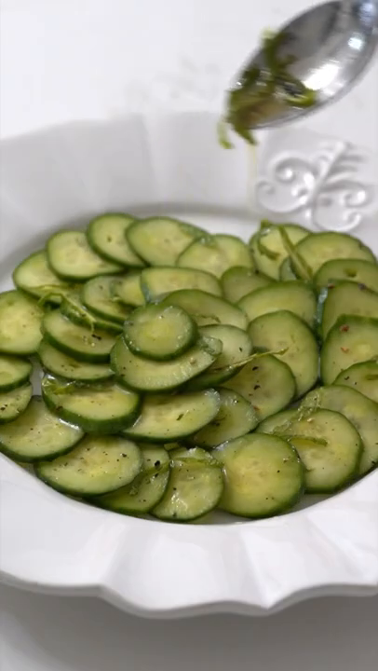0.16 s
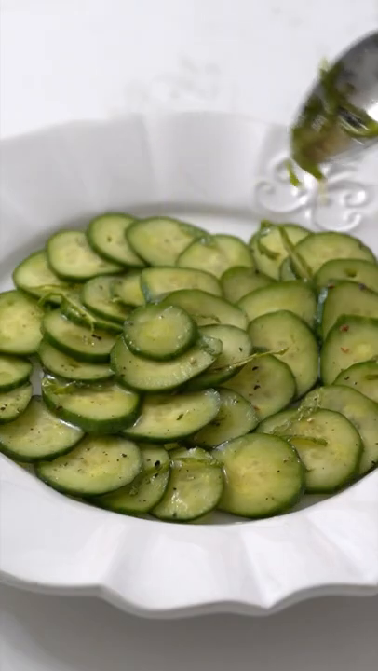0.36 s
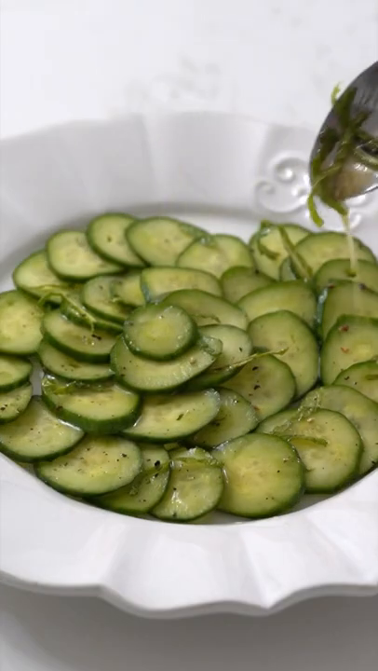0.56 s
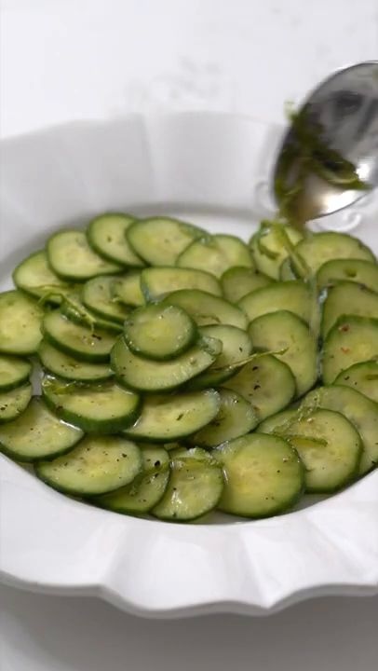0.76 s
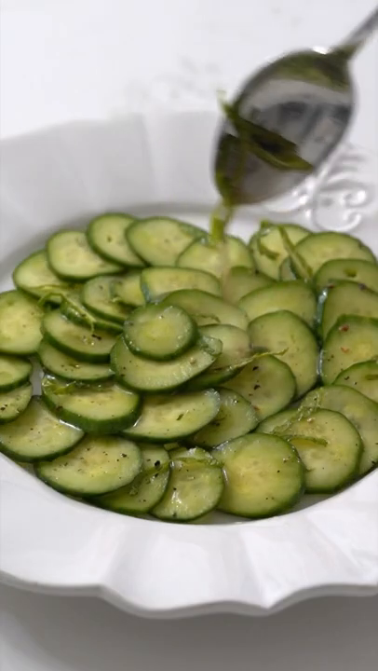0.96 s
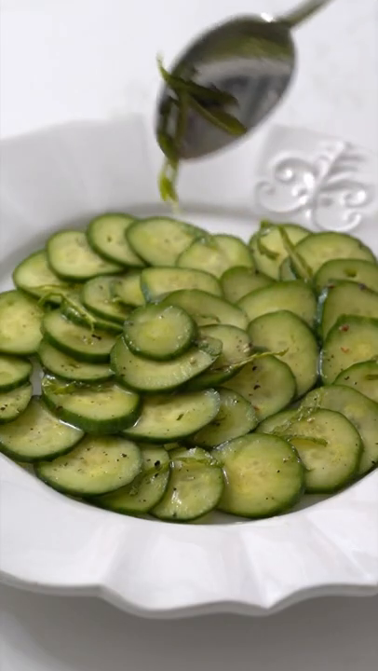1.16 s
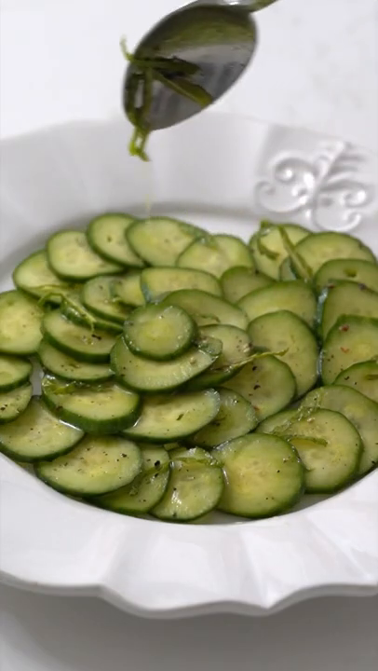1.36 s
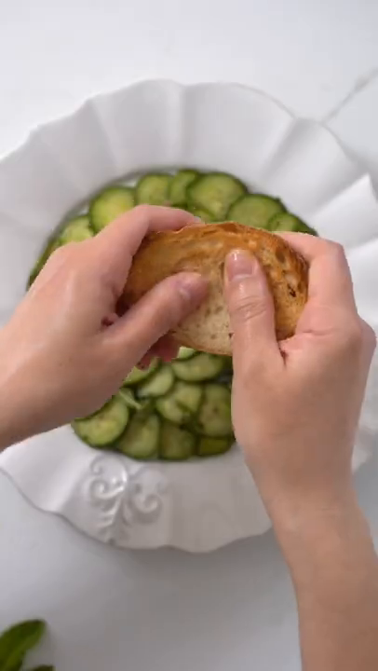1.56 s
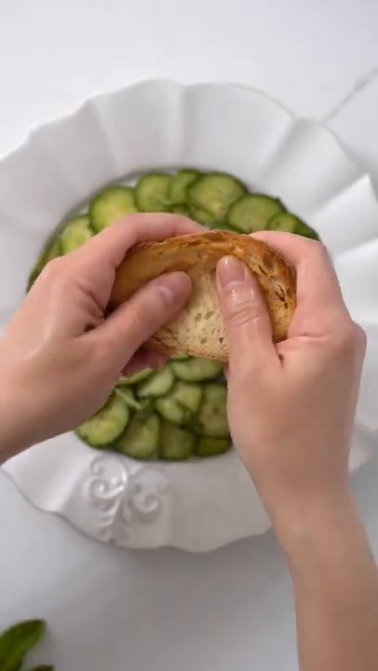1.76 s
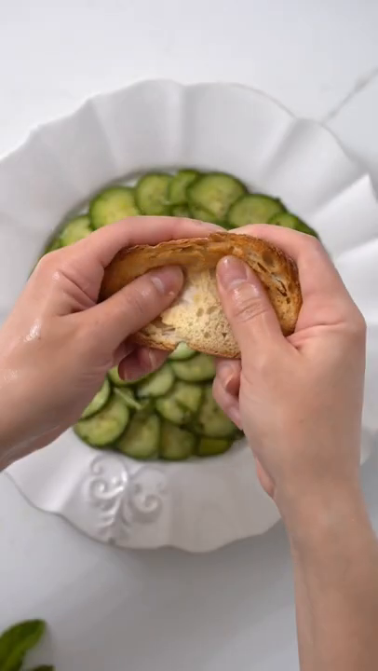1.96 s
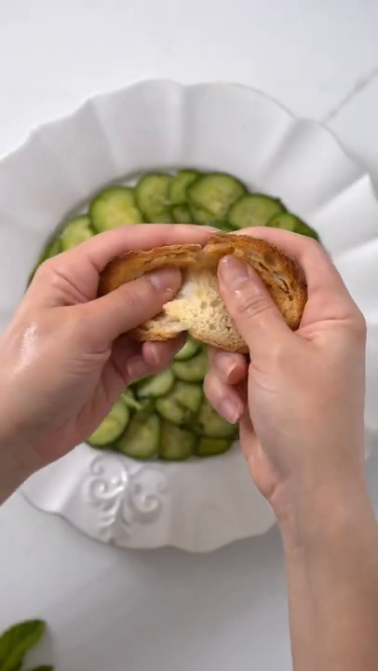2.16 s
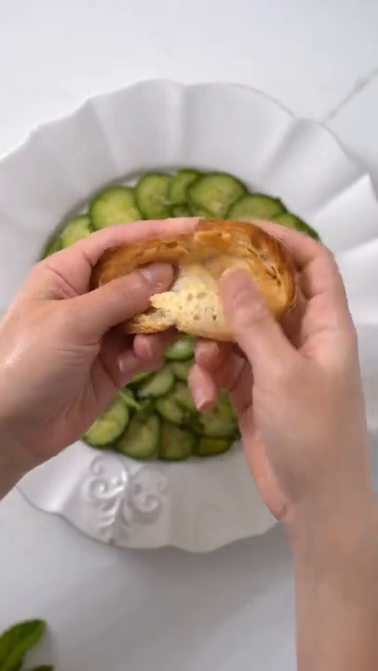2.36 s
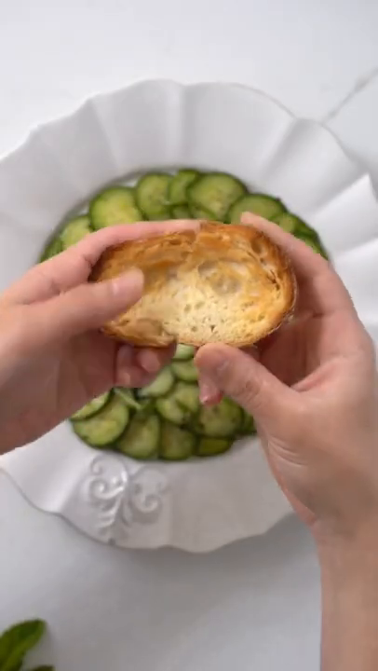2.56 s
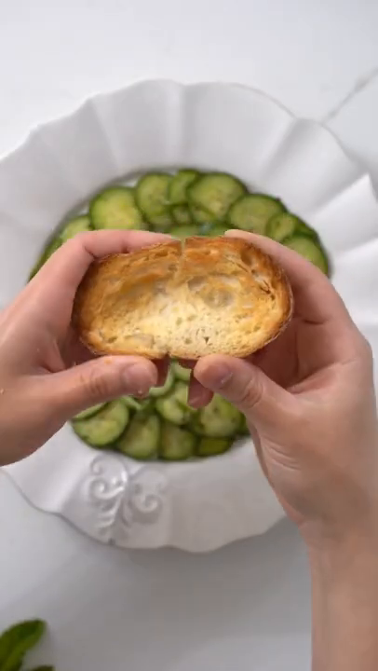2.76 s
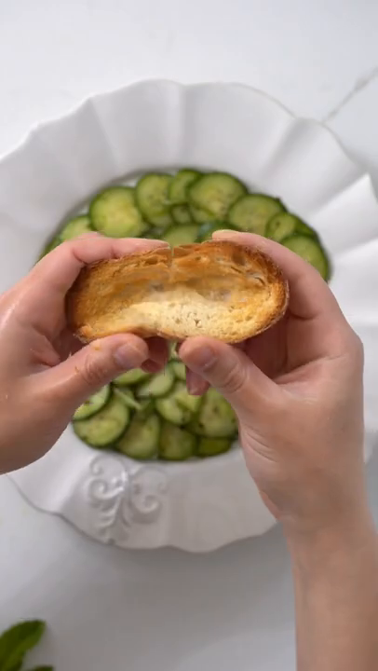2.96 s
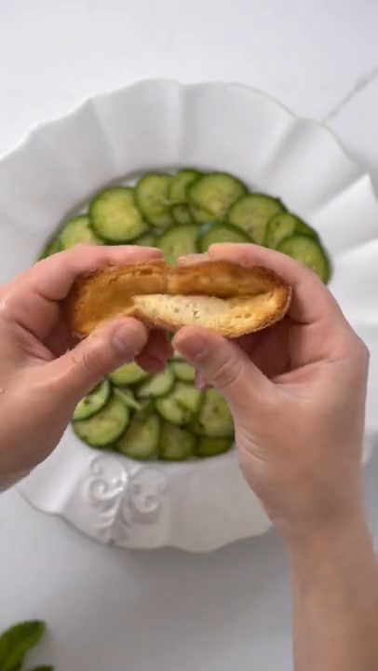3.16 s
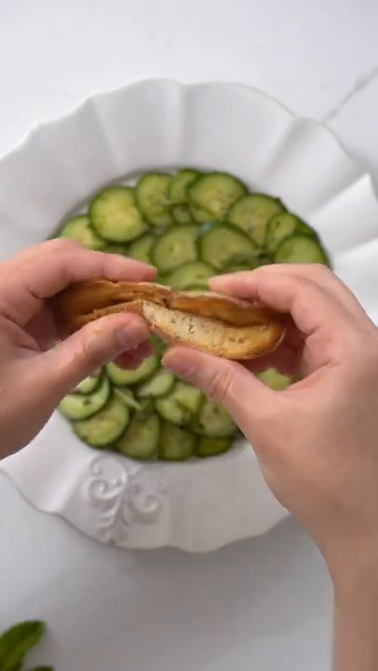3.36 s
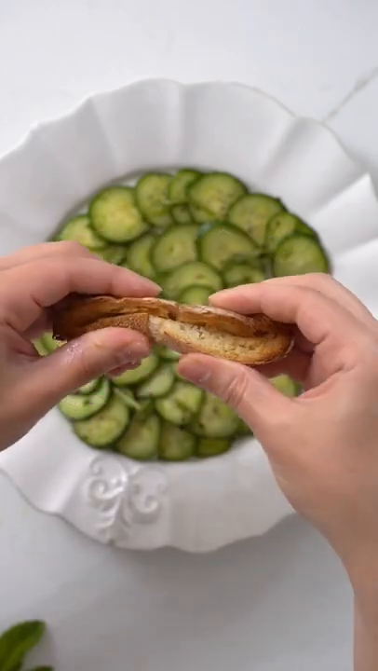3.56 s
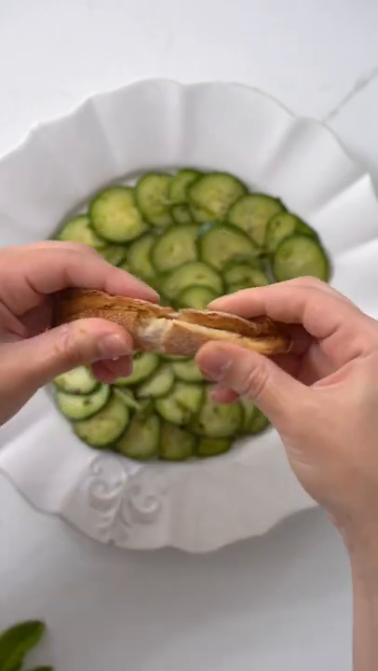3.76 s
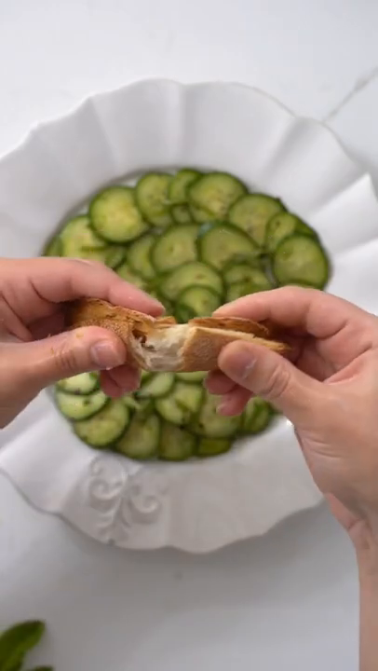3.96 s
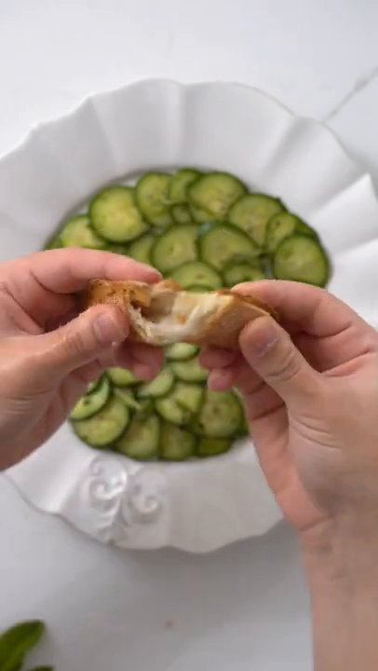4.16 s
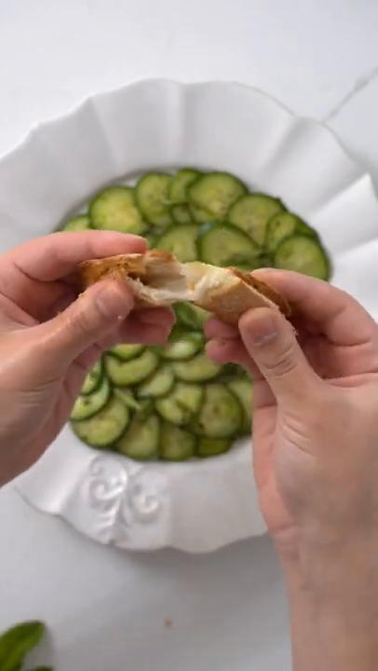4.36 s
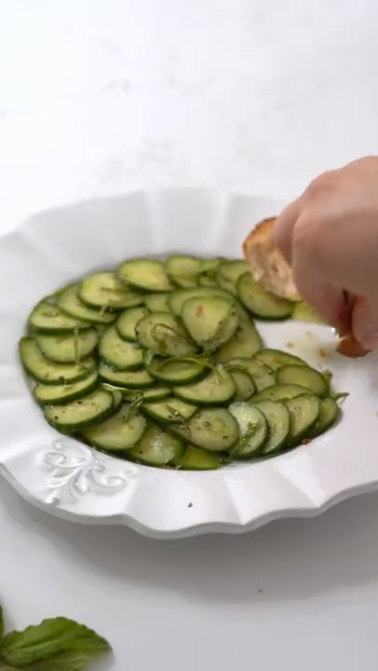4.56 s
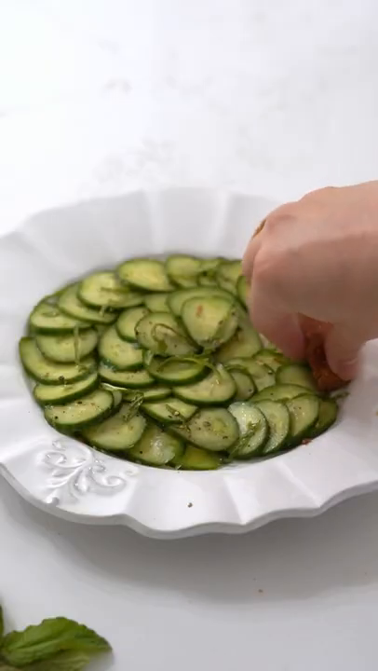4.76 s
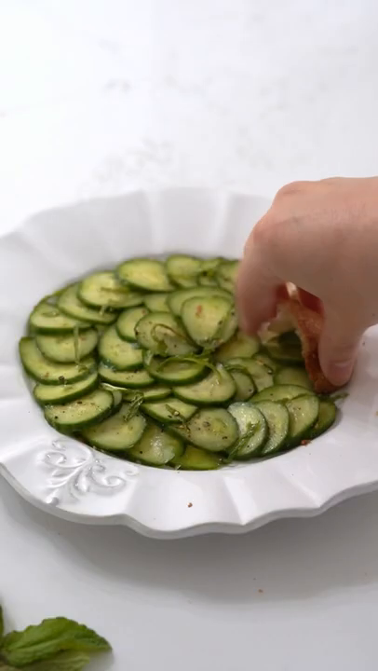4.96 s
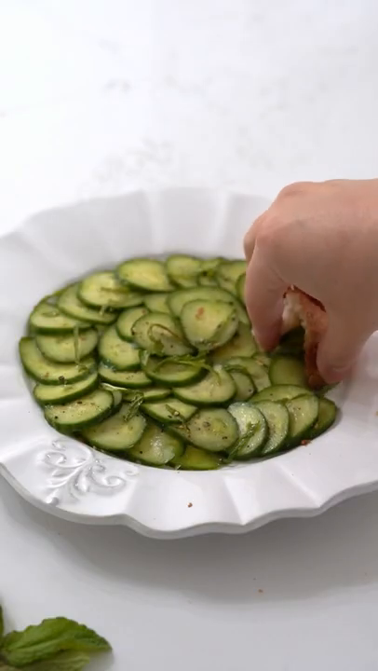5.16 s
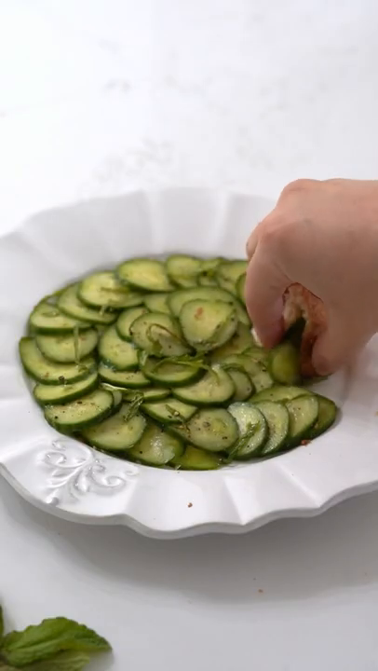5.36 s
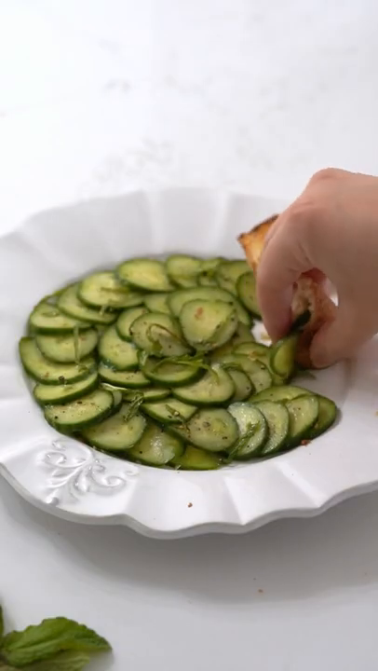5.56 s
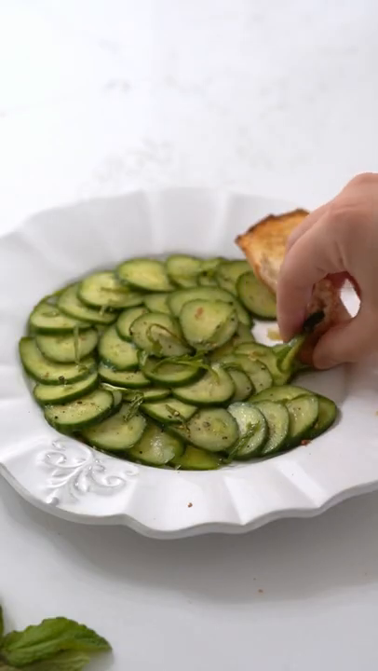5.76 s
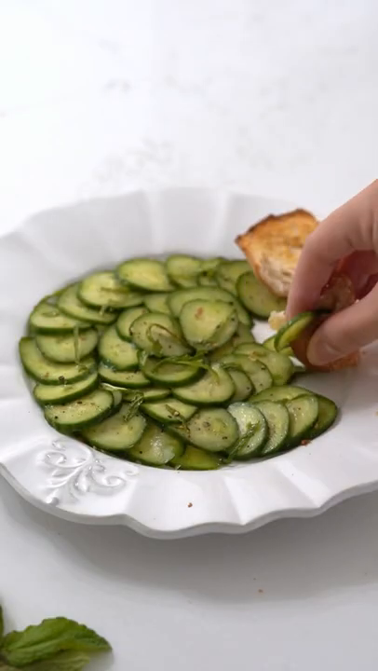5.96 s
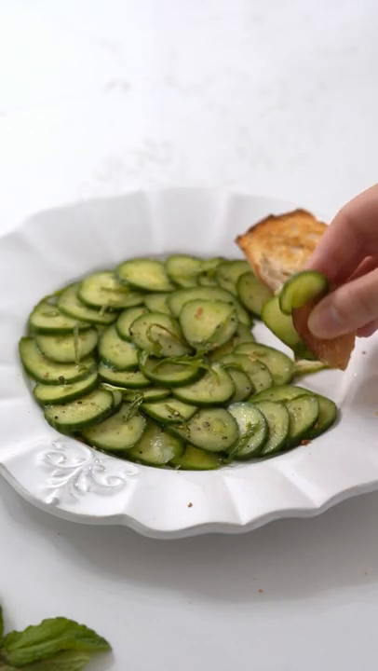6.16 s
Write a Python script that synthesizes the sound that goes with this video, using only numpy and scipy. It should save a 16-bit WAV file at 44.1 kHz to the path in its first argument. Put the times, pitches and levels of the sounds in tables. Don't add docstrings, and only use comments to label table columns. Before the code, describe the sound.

An appliance motor hums briefly, then crisp toast crunches and snaps loudly between hands, followed by light scraping and two knocks on a ceramic plate.

```python
import sys
import numpy as np
from scipy import signal
from scipy.io import wavfile
from scipy.ndimage import uniform_filter1d

SR = 44100
rng = np.random.default_rng(int(sys.argv[2]) if len(sys.argv) > 2 else 0)


def waveform_to_disk(signal):
    frames = np.transpose(np.atleast_2d(signal))
    scaled = np.clip(frames, -1, 1) * 32767
    samples = np.round(scaled).astype(np.int16)
    wavfile.write(sys.argv[1], SR, samples)


def boost_factor(decibels):
    exponent = np.asarray(decibels, float) / 20
    return 10 ** exponent


N = 277389
T = np.arange(N) / SR

JOINS = (1.468, 4.556)
# frequency in Hz, density in dB per Hz.
CRUST = [(150, -33), (300, -28.5), (500, -19.5), (850, -14.5), (1250, -10), (1700, -3), (2200, -1.5),
         (3200, -1.5), (6500, -4.5), (9000, -6), (16000, -7)]
# time in seconds, peak in dB, ring in dB, weight of the upper modes in dB.
KNOCKS = [
    (4.6838, -27, -17.5, -2),
    (5.0095, -32.5, -20.5, 7),
]


def evened(x):
    return x / np.sqrt(np.mean(x ** 2) + 1e-20)


def read(points, hz):
    f, value = np.transpose(points)
    return np.interp(np.log(hz + 1), np.log(f + 1), value)


def add(mix, s, sound):
    part = mix[..., round(s * SR):][..., :sound.shape[-1]]
    part += sound[..., :part.shape[-1]]


def coloured(x, gain_db):
    log = np.log(boost_factor(np.maximum(gain_db(abs(np.fft.fftfreq(1024, 1 / SR))), -90)))
    taps = np.fft.ifft(np.exp(log - 1j * signal.hilbert(log).imag)).real[:512]
    return signal.oaconvolve(x, taps)[:len(x)]


def wander(hz):
    return evened(sum(np.sin(2 * np.pi * (f * T + rng.random())) for f in hz * np.geomspace(.1, 1, num=8)))


def take(k):
    fades = (.03, .009)
    after = [1, *(np.clip((T - s) / fade + .5, 0, 1) for s, fade in zip(JOINS, fades)), 0]
    return after[k] - after[k + 1]


def air():
    # frequency in Hz, density in dB per Hz.
    colours = [
        [(12, -35), (20, -18), (80, -9.5), (154, -6.5), (241, -9), (386, -17), (516, -20), (588, -21),
         (894, -21.5), (1050, -26), (1430, -22), (2070, -27), (3310, -26.5), (6380, -33.5), (10500, -36),
         (13600, -88), (22000, -120)],
        [(12, -30), (30, -6), (55, 1), (100, 9.5), (160, 5), (330, 5.5), (900, 0), (1500, -2), (3300, -6),
         (8000, -8.5), (16500, -12)],
        [(12, -28), (25, -14), (45, -3), (75, -7), (146, -11), (204, -7.5), (367, -11), (642, -12),
         (1000, -16.5), (1960, -18), (2670, -20), (3250, -20.5), (11400, -25.5), (14500, -27), (16500, -31)],
    ]
    levels = [-53.5, -55.5, -58.5]
    # frequency in Hz, likeness from -1 to 1.
    likeness = [(20, 0.9), (60, 0.98), (180, 0.83), (550, 0.01), (1650, -.1), (5000, 0.02), (15000, 0.1)]
    first_edge_hz = 10620
    frames, hz = N // 512 + 5, np.fft.rfftfreq(2048, 1 / SR)
    a, b, c, d, patches = rng.standard_normal((frames, 1025, 5)).T
    patches = evened(uniform_filter1d(uniform_filter1d(patches, 12, 0), 6, 1))
    same = np.clip(read(likeness, hz), -1, 1)[:, None]
    left = a + 1j * b
    right = same * left + np.sqrt(1 - same ** 2) * (c + 1j * d)
    z = np.array([left, right]) * boost_factor(1.63 * patches)
    out = np.zeros((2, N))
    for k, (colour, db) in enumerate(zip(colours, levels)):
        gain = boost_factor(read(colour, hz)) * (k > 0 or hz < first_edge_hz)
        noise = signal.istft(z * gain[..., None], nperseg=2048, noverlap=1536)[1][:, :N]
        out += take(k) * boost_factor(db) * evened(noise)
    return out


def machines():
    # multiple of the shaft rate, level in dB.
    motor = [(1, -64), (2, -66), (24, -81), (26, -79), (27, -80), (30, -73.5), (31, -69), (41, -80),
             (44, -83), (47, -83), (51, -79), (57, -81)]
    # frequency in Hz, level in dB.
    booms = [(110, -64.5), (148.5, -58.5), (171, -66), (236, -65), (255, -66), (510, -75.5), (3287, -80),
             (3405, -83), (10816, -84)]
    # start in seconds, end in seconds, multiple of its rate, level in dB.
    swells = [
        (2.2, 3.0, 1, -87),
        (4.446, 5.366, 1, -68.5),
        (4.505, 4.7, 2, -64),
        (5.49, 6.4, 2, -63),
    ]
    faint = (-72.5, -79)
    shaft_hz, drone_hz, swell_s = 29.61, 97.4, 0.046
    out = np.zeros((2, N))
    tones = [(round(k) * shaft_hz, db, .8, 0) for k, db in motor] + [(hz, db, 3., .6) for hz, db in booms]
    for hz, db, waver_db, drift in tones:
        step = rng.random() + rng.uniform(-.12, .12, (2, 1)) * min(hz / 900, 1)
        step = step + drift * wander(5.2) / (2 * np.pi)
        out += np.sqrt(2) * boost_factor(db + waver_db * wander(14.)) * np.sin(2 * np.pi * (hz * T + step))
    drone = sum(boost_factor(db) * np.sin(2 * np.pi * (k + 1) * drone_hz * T) for k, db in enumerate(faint))
    for start, end, k, db in swells:
        swell = np.clip(np.minimum(T - start, end - T) / swell_s, 0, 1)
        drone += boost_factor(db - 3.5) * swell * np.sin(2 * np.pi * round(k) * drone_hz * T)
    drone += boost_factor(-73.5 + 1.5 * wander(4.7)) * np.sin(2 * np.pi * 59.2 * T)
    return take(0) * out * boost_factor([[.6], [-.6]]) + np.sqrt(2) * (1 - take(0)) * drone


def patter():
    # peak in seconds, strength in dB, swell in dB/s, release in dB/s.
    presses = [(1.57, -32, 152, 60), (1.81, -38.5, 60, 91), (1.91, -43, 1203, 194), (2.049, -40, 500, 54),
               (2.28, -33, 600, 500), (2.3, -55, 498, 100), (2.97, -36, 105, 204), (3.218, -29.5, 137, 199),
               (3.4, -32, 210, 502), (3.441, -32, 2502, 800), (3.46, -42.5, 600, 36),
               (3.62, -30.5, 258, 160), (3.772, -24.5, 259, 203), (3.87, -44.5, 300, 46),
               (4.21, -45, 30, 128), (5.41, -55, 400, 200), (5.516, -50, 290, 87), (5.785, -56, 400, 151),
               (6.132, -57, 697, 117)]
    # time in seconds, crisp part above slab ring in dB.
    brittle = [(1.5, 8), (3.25, 7), (3.4, -10), (3.55, 6.5), (3.8, -5.5), (4.2, 2), (5.41, 11.5),
               (5.7, 4.5), (6.2, 5)]
    rate = 1300 * boost_factor(6.5 * evened(uniform_filter1d(rng.standard_normal(N), 250)))
    sizes = boost_factor(3.3 * np.minimum(rng.exponential(1, N), 4.2))
    clicks = (rng.random(N) < rate / SR) * sizes * rng.choice([-1, 1], N)
    slab = coloured(clicks, lambda hz: read(CRUST, hz) + read([(3000, 0), (4200, -21.5)], hz))
    crisp = coloured(clicks, lambda hz: read(CRUST, hz) + read([(2800, -13.5), (3800, 1.0)], hz))
    curves = []
    for s, db, swell, release in presses:
        cut_off = 99 * (s < JOINS[1]) * (T > JOINS[1])
        curves.append(db - np.maximum(swell * (s - T), release * (T - s)) - cut_off)
    press_db = np.max(curves, axis=0)
    brittle_db = np.interp(T, *np.transpose(brittle))
    fractures = evened(slab) * boost_factor(-8.0) + evened(crisp) * boost_factor(brittle_db - 9.5)
    return boost_factor(press_db) * fractures * (1 - take(0)) * boost_factor(0.26)


def snap(s, peak_db, crisp_db, shard_hz, ms, uneven_db, chance):
    lead_s = .004
    brief = ms < 7.4
    ahead = np.arange(2000) / SR - lead_s
    t = np.maximum(ahead, 0) / (ms / 1000)
    envelope = (t + 0.091) ** (.5 if brief else 1.3) * (np.exp(-3 * t ** 2) + 0.11 * np.exp(-t / 1.53))
    burst = chance[:2000] * boost_factor(uneven_db * chance[2000:]) * envelope
    burst *= np.where(ahead < 0, 0.58 * np.exp(ahead / 0.0013), 1)
    tilt = [(400, -3), (900, -6), (1500, -5.5 - crisp_db), (2500, -.6 - crisp_db), (3800, -0.44),
            (5500, 0.024), (8000, crisp_db + 0.1), (15000, crisp_db - 4.5)]

    def colour(hz):
        shard = 4.7 * np.exp(-(np.log2((hz + 1) / shard_hz) / 0.17) ** 2)
        return read(CRUST, hz) + read(tilt, hz) + shard

    click = np.linalg.norm(burst) * (np.arange(2000) == abs(burst).argmax())
    near = coloured(burst, colour)
    far = coloured(click if brief else burst, colour)
    return s - lead_s, boost_factor(peak_db) * np.array([near, far]) / abs(near).max()


def breaks():
    # time in seconds, peak in dB, crispness in dB, loudest shard in Hz.
    clear_snaps = [(1.493, -26.5, -6, 2110), (1.4999, -23.5, 15, 2090), (1.5266, -15, 6, 2110),
                   (1.5855, -13, -5.5, 2170), (1.6508, -13.5, 4, 5710), (1.6793, -17, 1, 2280),
                   (1.7145, -17, -4.5, 2300), (1.7597, -14, -0.5, 2230), (1.7208, -18.5, -10, 2240),
                   (1.8162, -6, 4, 6600), (1.8664, -23, -5, 6960), (1.9087, -7, -2, 4100),
                   (1.9205, -6, 0.5, 4300), (1.9728, -16, 3, 7500), (1.9959, -17.5, 4, 4560),
                   (2.0474, -8.5, 0.5, 2950), (2.1423, -17.5, -0.5, 2950), (2.1615, -17.5, 0, 4050),
                   (2.1945, -20, 1, 4200), (2.27, -15, -1.5, 3360), (2.2746, -11, -2.5, 4730),
                   (2.345, -18, 4, 9350), (2.383, -19, -3, 3270), (2.4817, -25.5, -1, 2660),
                   (2.5259, -24.5, -3.5, 2580), (2.558, -28.5, -1, 2450), (2.5852, -32, -8, 2050),
                   (2.617, -36.5, 14, 2470),
                   (2.674, -52, 3, 11000), (2.7377, -52, -4, 8000), (2.75, -32, -2, 2780),
                  (2.7653, -29.5, -2, 5700), (2.7697, -25, -2.5, 3630), (2.818, -29, -0.5, 4020),
                  (2.8468, -24, 0.5, 5330), (2.912, -20, -0.5, 2680), (2.9244, -11, -1, 4360),
                  (2.9778, -8, -1, 6400), (3.119, -20, -2.5, 2960), (3.137, -10, 0, 5200),
                  (3.1902, -14, 0.5, 2160), (3.2255, -18, -6, 2620), (3.2292, -14.5, 9, 11100),
                  (3.254, -19.5, -8.5, 3540), (3.362, -15, -0.5, 3220), (3.4413, -8, -1.5, 4330),
                  (3.4988, -25, -9, 1800), (3.5242, -20.5, -5, 2660), (3.544, -22.5, 3, 6500),
                  (3.5876, -26, 1, 5300), (3.5965, -20.5, -6, 2160), (3.6211, -20, -2, 2270),
                  (3.654, -17, -1, 2880), (3.7325, -17, 3, 3220), (3.7736, -11, -0.5, 2830),
                   (3.897, -21, -0.5, 2600), (3.9666, -20, -2.5, 6500), (4.0275, -21.5, 1, 2460),
                  (4.0783, -28, 11, 6100), (4.134, -24, 3, 5830), (4.153, -30.5, 7, 11100),
                  (4.1736, -35, 4, 11300), (4.1901, -21, 1.5, 4460), (4.2259, -30, 1, 5000),
                  (4.2826, -38, -5, 4000), (4.4304, -35, 1.5, 3800), (4.5451, -37.5, 3, 3660)]
    late_snaps = [(5.2126, -43, 14, 11500), (5.386, -55, 6, 7000), (5.535, -39, -8, 2000),
                  (5.4026, -30, 2, 3800), (5.408, -29, -0.5, 4100), (5.4172, -33, 3, 3510),
                  (5.4358, -37, 3, 2500), (5.491, -36, -2.5, 1940), (5.5045, -32.5, 0, 1940),
                  (5.5208, -22.5, -2, 1860), (5.7768, -27.5, 3, 3480)]
    crushes = [(1.5215, -14.5, 0.5, 2140), (1.553, -9.5, 4, 2350), (1.5683, -21.5, -6.5, 8100),
               (1.5994, -22, 16, 2460), (1.7569, -18, 2.5, 2210), (1.87, -19.5, -3, 6210),
               (2.878, -21, 1, 4400), (2.9852, -18, 11, 5740), (3.1444, -12, 7, 2700),
               (3.1945, -17.5, -4.5, 2100), (3.2146, -25, -1.5, 2460), (3.3873, -26, 0, 2960),
               (3.6072, -24, -1, 2290), (3.6307, -24, 0, 2900), (3.719, -19, 1.5, 2150),
               (3.7563, -18.5, 1, 1800), (3.7659, -16, 3.5, 2730), (3.7848, -29, 2, 2620),
               (4.195, -35, 8, 5500), (5.527, -37, 2, 2000), (5.67, -54, -12, 1950), (5.69, -49, -13, 2050),
               (5.712, -47, -6, 2000), (6.1345, -47, -7, 2090)]
    # time in seconds, peak in dB,
    # loudest shard in Hz.
    small_cracks = [(1.5147, -27, 5500), (1.532, -29, 2900), (1.5524, -17, 2000), (1.5579, -18, 2500),
                    (1.5725, -16, 2000), (1.6022, -29, 2400), (1.6195, -23, 2200), (1.63, -19, 2500),
                    (1.6857, -22, 2500), (1.6972, -27, 2300), (1.7028, -21, 2500), (1.7259, -23.0, 2500),
                    (1.787, -28, 2100), (1.798, -32, 2240), (1.8095, -24, 2800), (1.8204, -15, 7400),
                    (1.8305, -13.5, 4200), (1.8384, -21, 9100), (1.8602, -21.0, 2300), (1.8728, -23, 6400),
                    (1.8752, -20.5, 4500), (1.8891, -33, 6400), (1.8963, -26, 6500), (1.906, -23, 6500),
                    (1.9285, -19, 12600), (1.95, -21, 6500), (1.967, -28, 3000), (1.9898, -28, 7800),
                    (2.0228, -22, 6000), (2.0612, -22, 7600), (2.0695, -19, 9600), (2.086, -28, 4100),
                    (2.0937, -32, 4000), (2.1075, -34, 2900), (2.1271, -33, 9200), (2.1318, -28, 2900),
                    (2.1686, -33, 4000), (2.203, -22, 4200), (2.2284, -31, 2000), (2.2449, -28, 4100),
                    (2.2527, -30, 4400), (2.2657, -22, 2900), (2.2783, -20.5, 1900), (2.2815, -29, 4100),
                    (2.2862, -26, 4700), (2.3017, -28, 4700), (2.3338, -34, 2100), (2.3495, -31, 9000),
                    (2.3557, -37, 6500), (2.3732, -32, 6600), (2.3875, -28, 2800), (2.455, -45, 2500),
                    (2.491, -40, 1700), (2.5113, -28, 6240), (2.6737, -56, 11700),
                    (2.7388, -53, 2200), (2.778, -29, 2800), (2.8037, -32, 3000), (2.8287, -29, 2700),
                   (2.8614, -23, 3600), (2.8867, -21, 4300), (2.894, -25, 6100), (2.9031, -20, 5900),
                   (2.9464, -17.5, 2700), (2.96, -31, 2900), (2.9878, -16, 2820), (2.9925, -34, 5900),
                   (3.004, -26, 5100), (3.0145, -20, 8500), (3.0199, -19.5, 3000), (3.077, -28, 2700),
                   (3.0965, -23.5, 13600), (3.1243, -26, 2800), (3.146, -19, 2500), (3.1541, -21, 3900),
                   (3.1677, -17, 2820), (3.197, -22, 3370), (3.2129, -12, 3420), (3.2332, -23, 2600),
                   (3.263, -21, 3500), (3.2768, -26, 2200), (3.3128, -29, 4200), (3.3552, -21, 3480),
                   (3.36, -30, 3100), (3.369, -20.5, 3900), (3.388, -20.5, 2630), (3.3941, -18.5, 2600),
                   (3.404, -23, 5000), (3.5091, -27.0, 2300), (3.559, -25, 2900), (3.585, -23, 5300),
                   (3.601, -23, 2600), (3.6086, -19, 6300), (3.6441, -22, 1900), (3.677, -28, 4300),
                   (3.6875, -25, 6500), (3.6956, -31, 5500), (3.7174, -28.0, 6300), (3.7213, -17, 1600),
                   (3.7354, -24, 3100), (3.7602, -17, 1580), (3.768, -13, 6500), (3.7892, -20, 3000),
                   (3.802, -23, 2200), (3.8384, -22, 2600), (3.848, -30, 2800), (3.8908, -28, 2680),
                   (3.9, -22, 3830), (3.9707, -21.5, 2500), (4.0082, -35, 2400), (4.028, -31, 3400),
                   (4.0436, -32, 7250), (4.0736, -27, 2400), (4.1184, -36.0, 6600), (4.31, -39, 7800)]
    # time in seconds, peak in dB.
    dull_cracks = [(1.601, -23), (1.627, -26), (1.7975, -24), (1.8597, -24), (1.9355, -24), (1.9968, -32),
                   (2.008, -38), (2.0306, -37), (2.039, -35), (2.093, -30), (2.1422, -32), (2.3336, -30),
                   (2.3732, -31), (2.9125, -33), (3.1945, -23), (3.4798, -26.5), (3.6206, -21),
                   (3.644, -22.5), (3.7392, -26), (4.0668, -35)]
    out = np.zeros((2, N))
    # rows, duration in ms, unevenness in dB
    kinds = ((clear_snaps, 2.7, 5.5), (late_snaps, 1.26, 4.), (crushes, 14.8, 8.5))
    for rows, ms, uneven_db in kinds:
        for row, chance in zip(rows, rng.standard_normal((len(rows), 4000))):
            add(out, *snap(*row, ms, uneven_db, chance))
    cracks = small_cracks
    chances = rng.standard_normal((len(cracks), 4000))
    for (s, peak_db), chance in zip(dull_cracks, chances[:, ::-1]):
        add(out, *snap(s, peak_db, crisp_db=-9, shard_hz=2300, ms=2.4, uneven_db=4., chance=chance))
    for (s, peak_db, hz), chance in zip(cracks, chances):
        add(out, *snap(s, peak_db, crisp_db=-1, shard_hz=hz, ms=1.3, uneven_db=4.2, chance=chance))
    return out


def gives():
    # time in seconds, peak in dB, pitch in Hz.
    rows = [(1.649, -41, 340), (1.703, -53, 396), (1.872, -48, 400), (2.346, -48, 403), (2.488, -52.5, 857),
            (2.873, -47.5, 650), (3.393, -49, 457), (3.497, -45.5, 453), (3.522, -46, 600),
            (3.761, -43, 398), (3.892, -55, 402), (4.686, -46.5, 444)]
    out = np.zeros((2, N))
    t = np.arange(800) / SR
    for s, peak_db, hz in rows:
        push = np.sin(2 * np.pi * hz * t) * (t / 0.0019) * np.exp(1 - t / 0.0017)
        add(out, s, boost_factor(peak_db - .7) * np.array([push, 0.14 * push]))
    return out


def kitchen(near, far):
    # delay in ms, level in dB.
    reflections = [(1.7, -9.5), (3.6, -9), (5.2, -12), (7.4, -12.5), (9.3, -17.5), (12.8, -16), (17.5, -17)]
    # frequency in Hz, t60 in seconds.
    decay = [(400, 0.39), (1500, 0.59), (4000, 0.5), (9000, 0.38), (16000, 0.2)]
    # frequency in Hz, level in dB.
    tail_db = [(400, 2), (1000, -6), (2500, -7), (6000, -1.5), (16000, 2.5)]
    # frequency in Hz, likeness from 0 to 1.
    likeness = [(300, 0.7), (1200, 0.89), (3000, 0), (8000, 0.06)]
    turn = 2 * np.pi * 3.1 * T
    lag = np.round(.65 * np.sin(5.3 * turn)).astype(int)
    lagged = near[np.clip(np.arange(N) + lag, 0, N - 1)]
    out = np.array([near, lagged]) * boost_factor([[-.5], [.5]])
    for k in range(3):
        taps, echoes = np.zeros((2, SR // 2)), np.zeros((2, SR // 20))
        at = np.arange(200, SR // 2 - 12, 12)
        at_both = at + rng.integers(0, 12, (2, len(at)))
        np.put_along_axis(taps, at_both, rng.choice([-1., 1.], (2, len(at))), 1)
        hz, t, z = signal.stft(taps, SR, nperseg=128)
        z = z * boost_factor(-60 * t / read(decay, hz)[:, None])
        z *= boost_factor(read(tail_db, hz))[:, None] / np.linalg.norm(signal.istft(z[0], SR, nperseg=128)[1])
        same = np.clip(read(likeness, hz), 0, 1)[:, None]
        z[1] = same * z[0] + np.sqrt(1 - same ** 2) * z[1]
        tail = signal.istft(z, SR, nperseg=128)[1]
        for ms, db in reflections:
            delays = (ms * SR / 1000 * rng.uniform(.85, 1.15, 2)).astype(int)
            echoes[[0, 1], delays] += boost_factor(db) * rng.choice([-1, 1], 2)
        share = np.sqrt(2 / 3) * abs(np.cos(turn + k * np.pi / 3))
        for x, answer in ((near, echoes), (far, tail)):
            wet = signal.oaconvolve((x * share)[None], answer, axes=1)[:, :N]
            out = out + wet * boost_factor([[-.8], [.8]])
    return out


def thud():
    # frequency in Hz, level in dB, t60 in seconds.
    modes = [
        (52.4, -53, 0.37),
        (230, -53, 0.32),
        (426, -42, 0.051),
    ]
    t = np.arange(SR // 2) / SR
    sag = t + 0.0038 * (1 - np.exp(-t / 0.021))
    tones = sum(boost_factor(db - 60 * t / t60) * np.sin(2 * np.pi * hz * sag) for hz, db, t60 in modes)
    return 4.259, (1 - np.exp(-t / 0.0023)) * tones


def knocks():
    # frequency in Hz, density in dB per Hz.
    blows = [
        [(180, -37), (300, -20), (688, -4), (1100, -8), (1400, 10), (1750, -1), (2380, -18), (3480, -17),
         (5100, -15), (5700, -25), (7000, -25), (9100, -66), (15400, -120)],
        [(180, -45), (300, -18), (765, -10), (1420, 9), (2220, -9), (3220, -9), (4360, -10), (5100, -12),
         (5700, -46), (9100, -85), (15400, -120)],
    ]
    out = np.zeros((2, N))
    t = np.arange(SR // 20) / SR
    for (s, peak_db, _, upper_db), colour in zip(KNOCKS, blows):
        blow = coloured(-1. * (t == 0), lambda hz: read(colour, hz))
        blow /= abs(blow).max()
        shake = boost_factor(1.5) * np.sin(2 * np.pi * 1450 * t) * np.sin(np.pi * np.minimum(t / 0.00283, 1))
        chip = np.sin(2 * np.pi * 3250 * t) * np.sin(np.pi * np.minimum(t / 0.00091, 1))
        chip *= boost_factor(0.67 * upper_db - 1)
        add(out, s, boost_factor(peak_db) * np.array([.6 * blow + shake + chip, boost_factor(7) * blow + 0.35 * shake]))
    return out


def ring(s, peak_db, ring_db, upper_db):
    # frequency in Hz, level in dB, t60 in seconds.
    plate = [(815, -11, .45), (1215, -5, .35), (1292, -1, .36), (1335, -1, .38), (1421, -5, .15),
             (1459, -1, .3), (1610, -4, .6), (1700, -11, .4), (2290, -15, .4), (2600, -14, .3),
             (3110, -3, .17), (3203, -9, .13), (4055, -11, .15), (5023, -11, .11)]
    t = np.arange(SR // 2) / SR
    modes = np.zeros((2, len(t)))
    for hz, db, t60 in plate:
        flutter_db = 3. * np.sin(hz % 90 * t * 2.4 + hz)
        level = boost_factor(db + upper_db * (hz > 2000) - 60 * t / t60 + flutter_db)
        modes += level * np.sin(2 * np.pi * hz * t + rng.uniform(-2.2, 1.0, (2, 1)))
    return s, boost_factor(peak_db + ring_db) * modes * (1 - np.exp(-t / 0.0039))


def ticks():
    # time in seconds, peak in dB, pitch in Hz.
    rows = [
        (4.947, -41.5, 3600),
        (4.9545, -44.5, 1500),
        (4.957, -42, 2600),
        (5.128, -42.5, 3930),
        (5.3517, -48, 3000),
        (5.75, -34.5, 3300),
    ]
    out = np.zeros((2, N))
    t = np.arange(400) / SR
    for s, peak_db, hz in rows:
        touch = np.sin(2 * np.pi * hz * t) * (t / 0.0003) * np.exp(1 - t / 0.00026)
        add(out, s, boost_factor(peak_db) * np.array([touch, 1.5 * touch]))
    return out


def scene():
    # time in seconds, peak in dB, ring in dB, weight of the upper modes in dB.
    tick_ring = (5.7502, -35.5, -32, 10)
    toast = patter() + breaks() + gives() + knocks() + ticks()
    late = T >= JOINS[1]
    room = kitchen(*(toast * ~late)) * take(1)
    room = room + kitchen(*(toast * late * boost_factor([[0], [-3.5]])))
    add(room, *thud())
    for row in KNOCKS + [tick_ring]:
        add(room, *ring(*row))
    return room + air() + machines()


def roll_off(x):
    return signal.sosfilt(signal.butter(12, 16980, fs=SR, output="sos"), x)


def record(dry):
    taps = signal.firwin(801, 15950, window=("kaiser", 9), fs=SR)
    passed = signal.oaconvolve(dry, taps[None], "same")
    return roll_off(passed)


dry = scene()
out = record(dry)
waveform_to_disk(out)
```